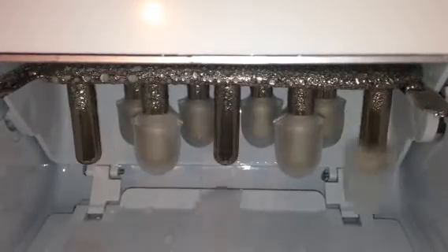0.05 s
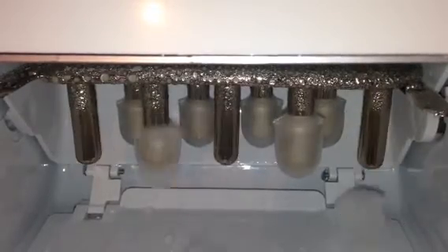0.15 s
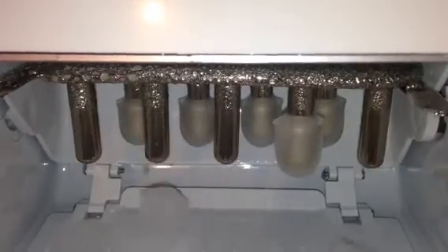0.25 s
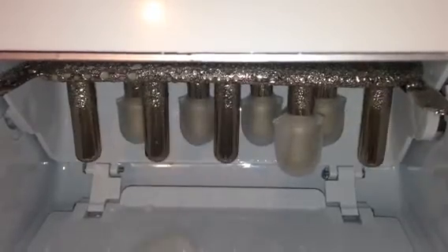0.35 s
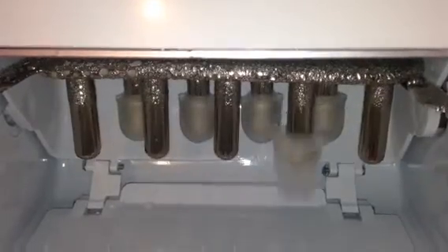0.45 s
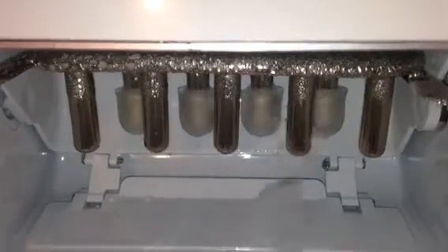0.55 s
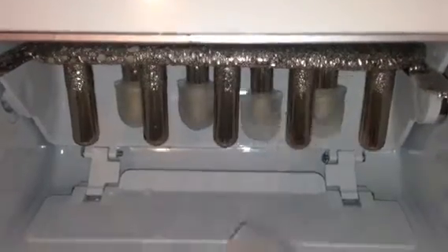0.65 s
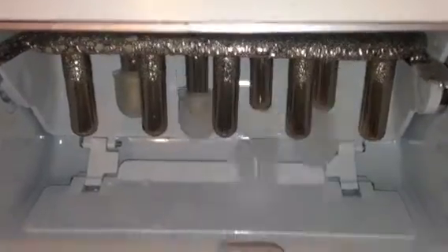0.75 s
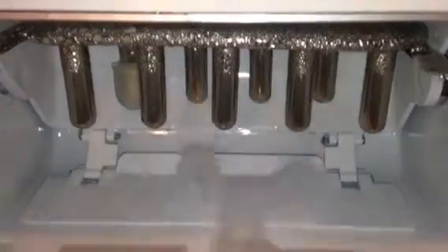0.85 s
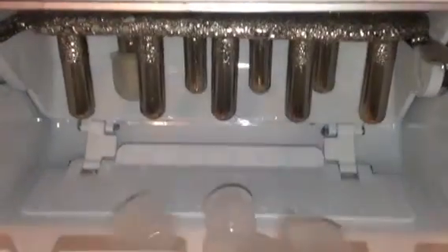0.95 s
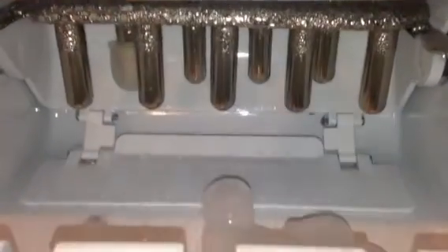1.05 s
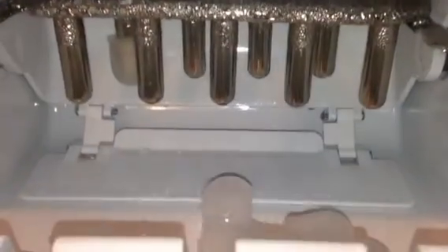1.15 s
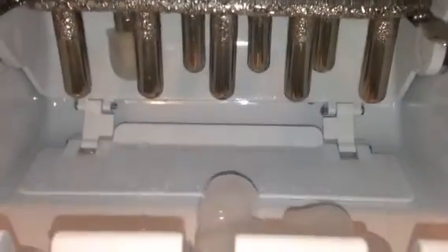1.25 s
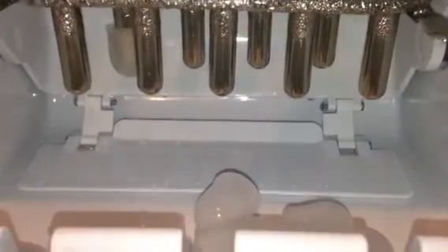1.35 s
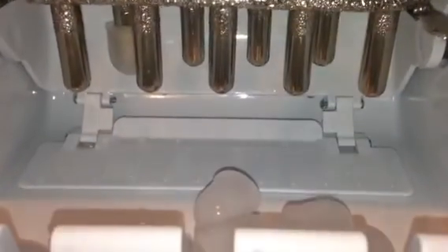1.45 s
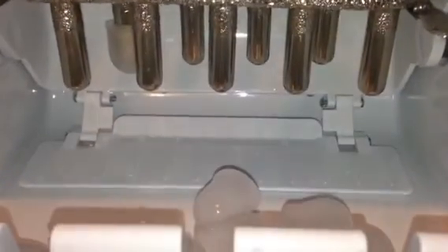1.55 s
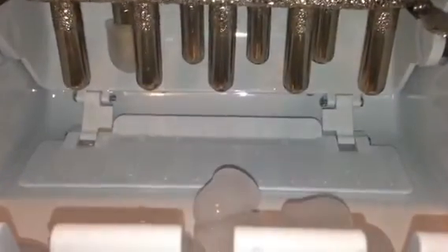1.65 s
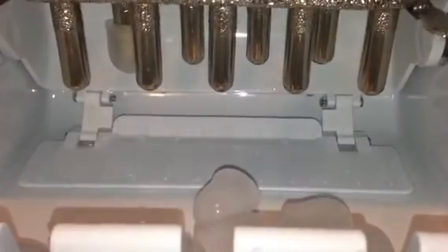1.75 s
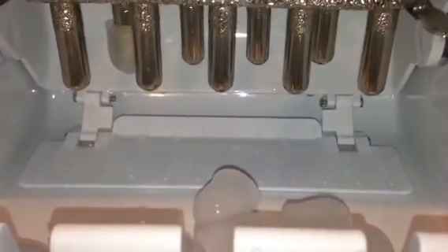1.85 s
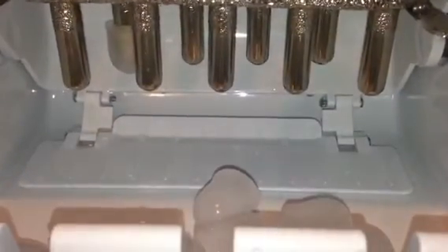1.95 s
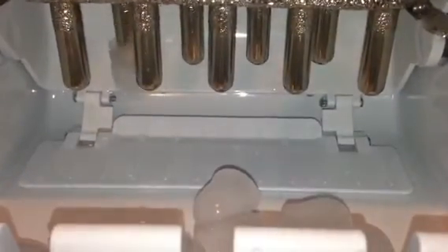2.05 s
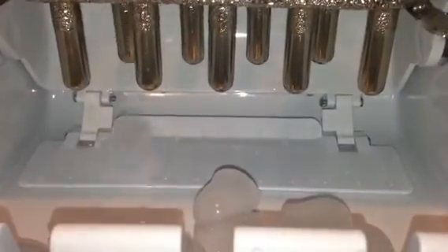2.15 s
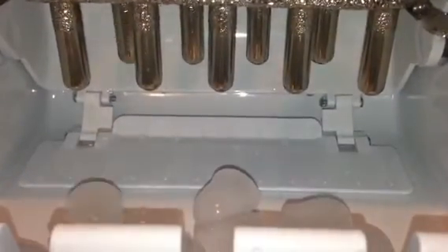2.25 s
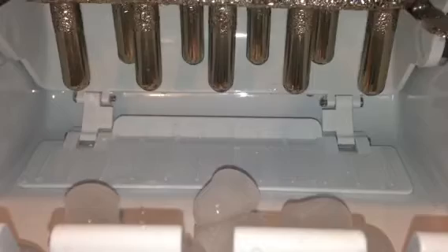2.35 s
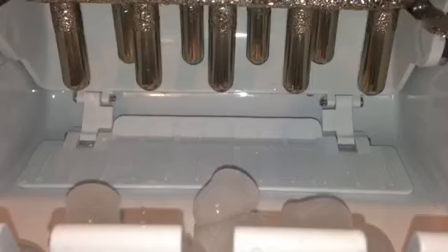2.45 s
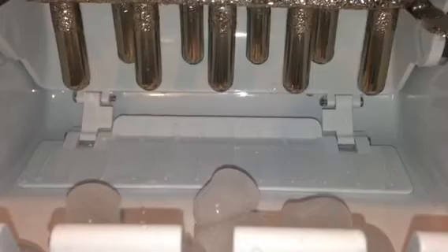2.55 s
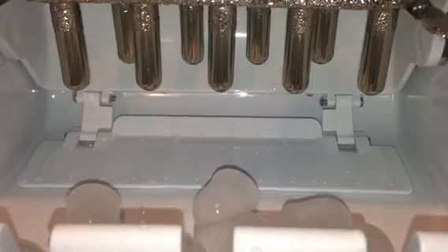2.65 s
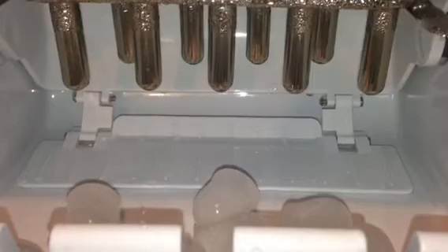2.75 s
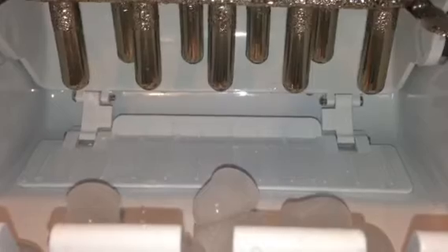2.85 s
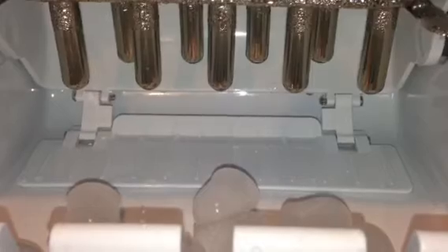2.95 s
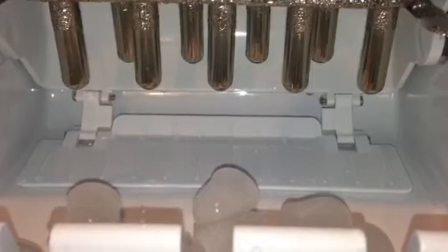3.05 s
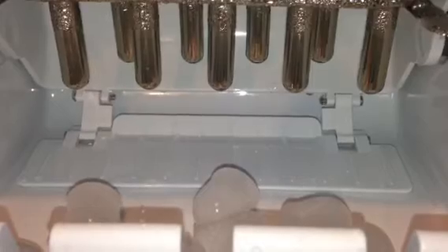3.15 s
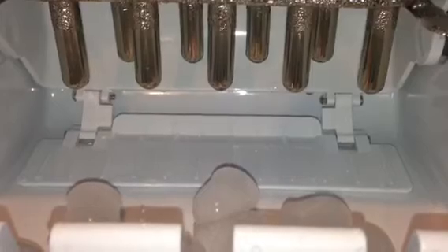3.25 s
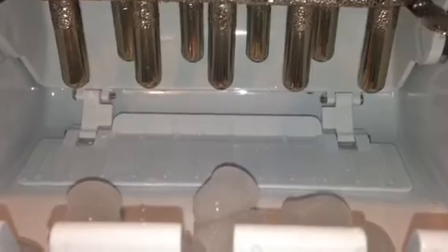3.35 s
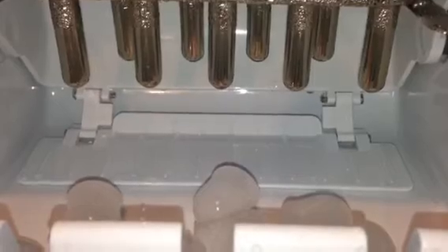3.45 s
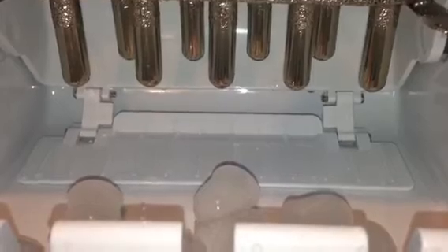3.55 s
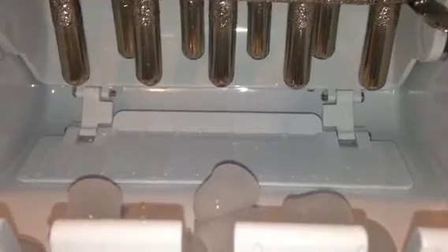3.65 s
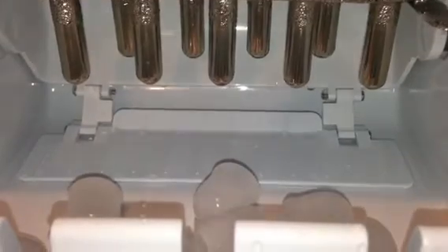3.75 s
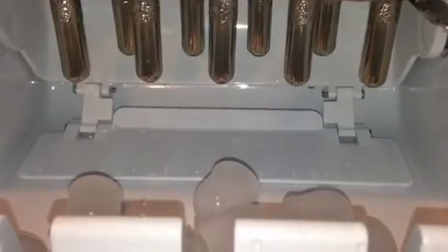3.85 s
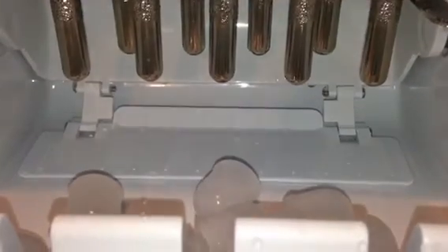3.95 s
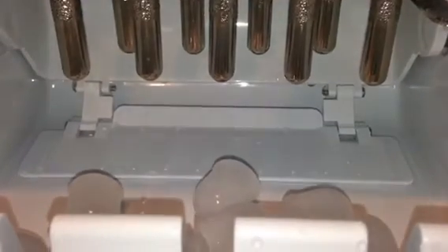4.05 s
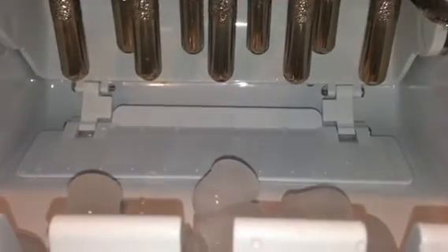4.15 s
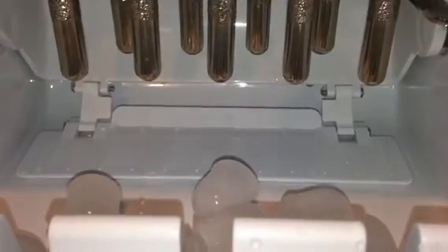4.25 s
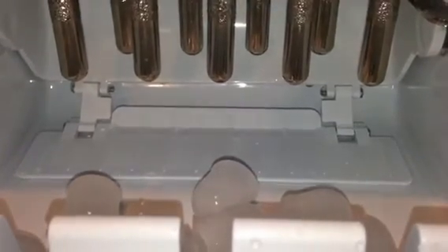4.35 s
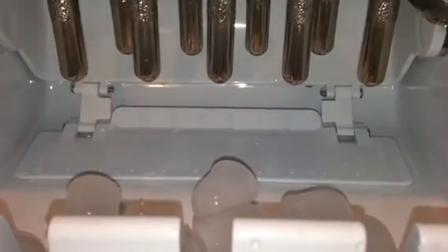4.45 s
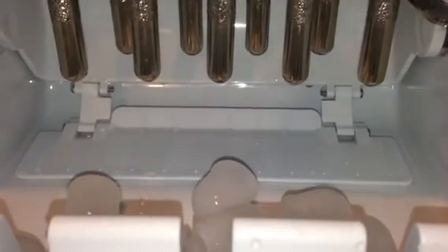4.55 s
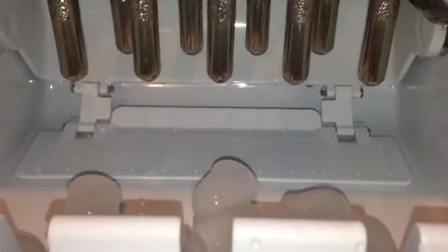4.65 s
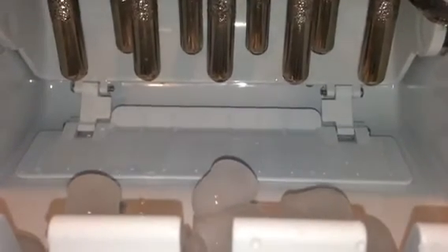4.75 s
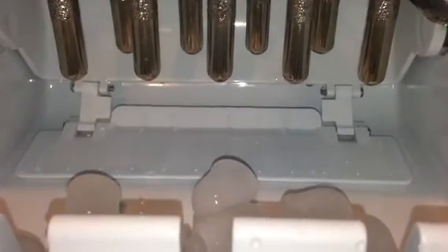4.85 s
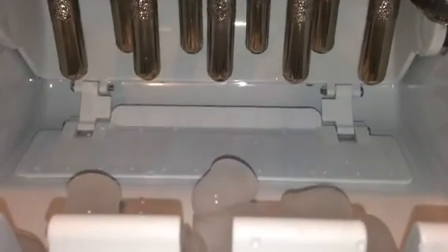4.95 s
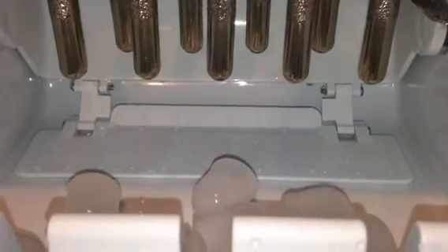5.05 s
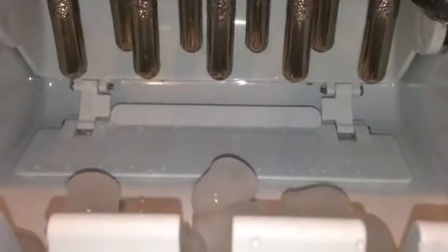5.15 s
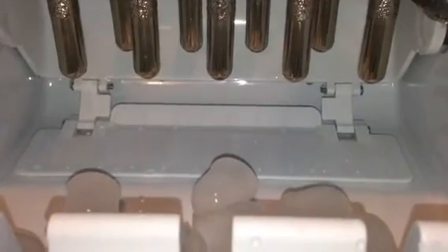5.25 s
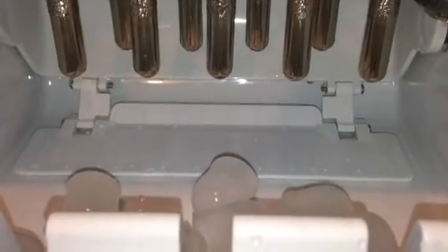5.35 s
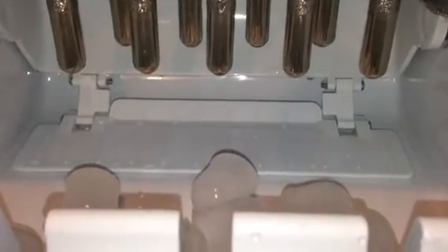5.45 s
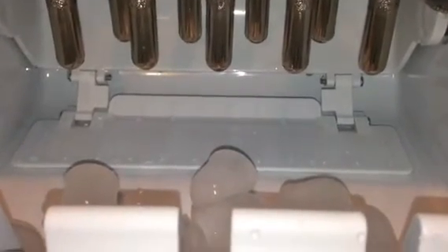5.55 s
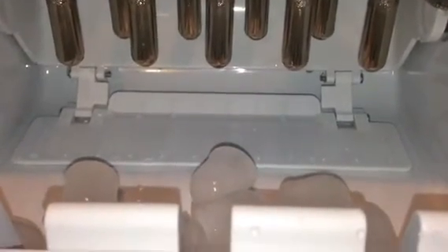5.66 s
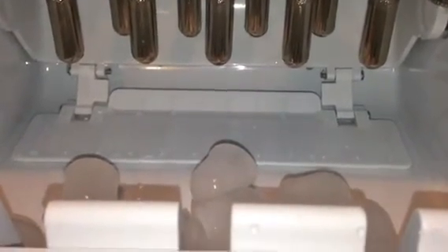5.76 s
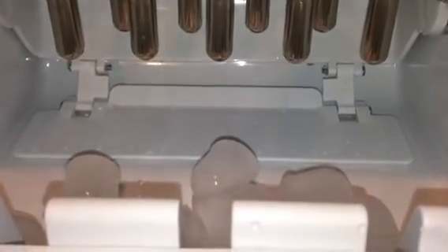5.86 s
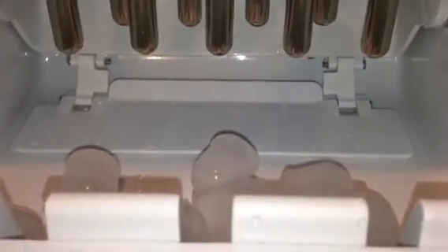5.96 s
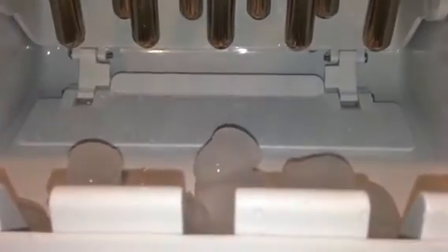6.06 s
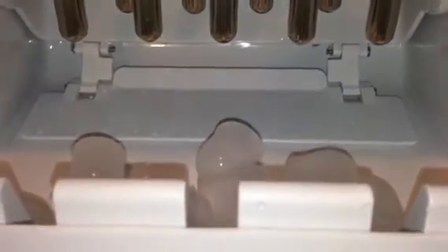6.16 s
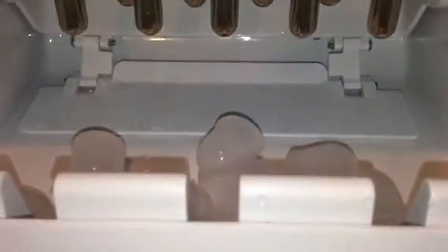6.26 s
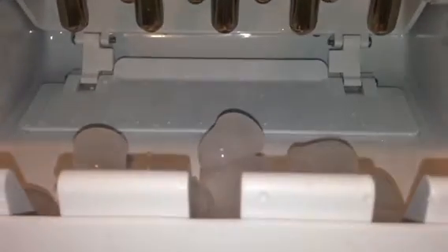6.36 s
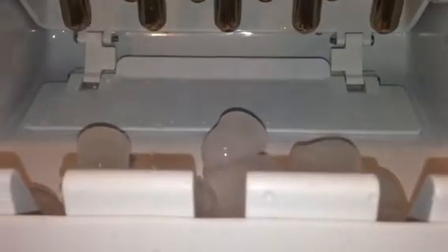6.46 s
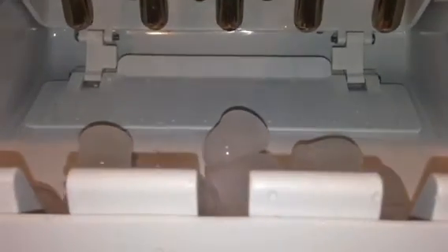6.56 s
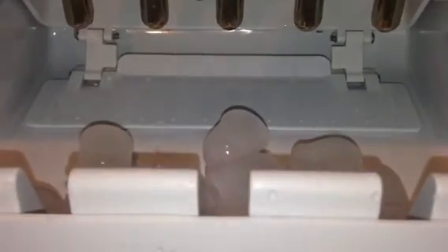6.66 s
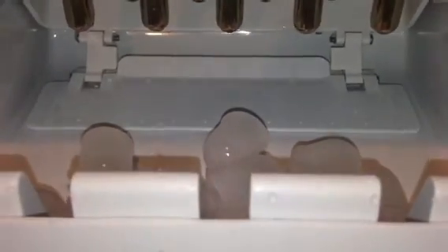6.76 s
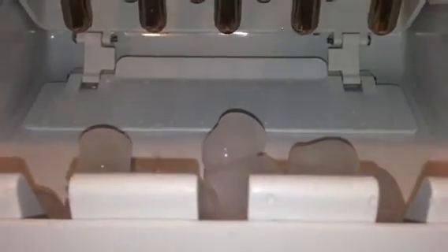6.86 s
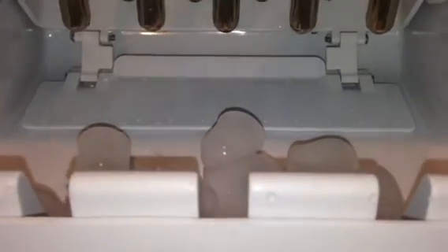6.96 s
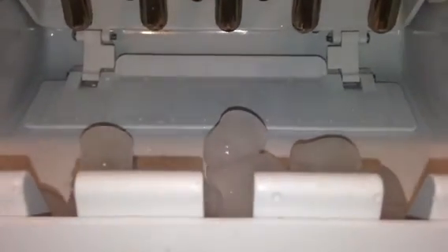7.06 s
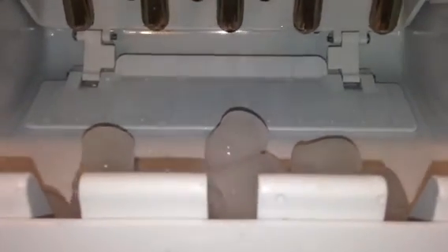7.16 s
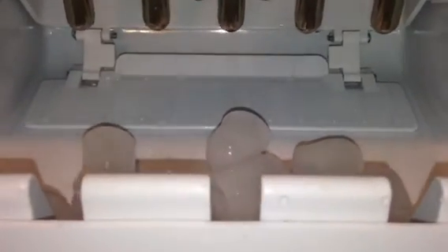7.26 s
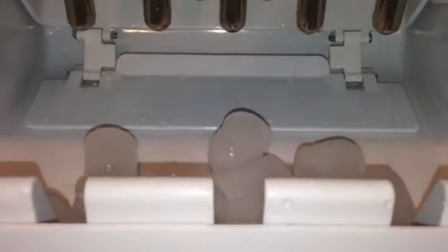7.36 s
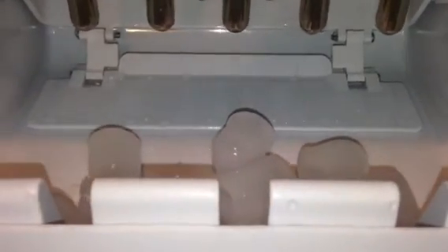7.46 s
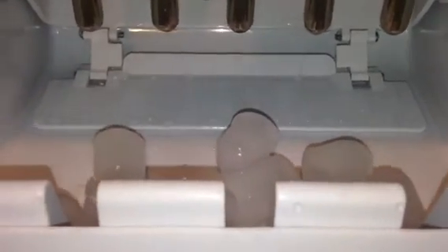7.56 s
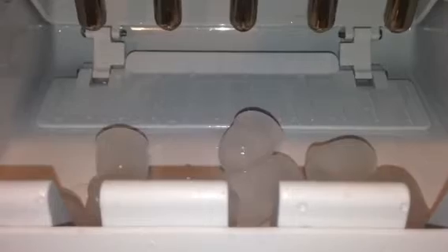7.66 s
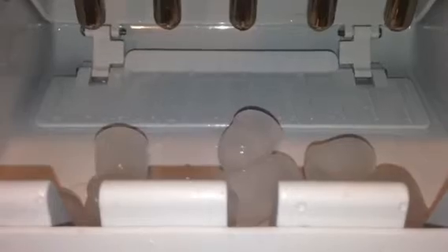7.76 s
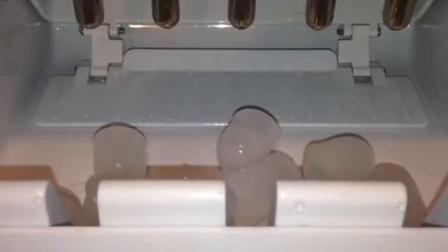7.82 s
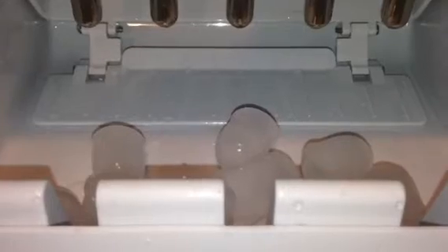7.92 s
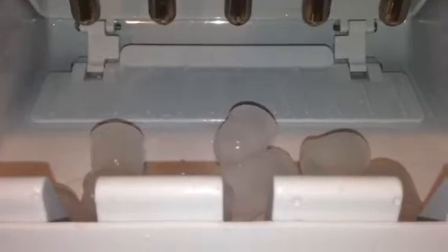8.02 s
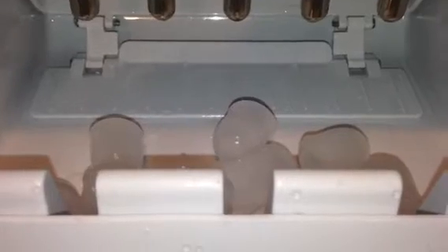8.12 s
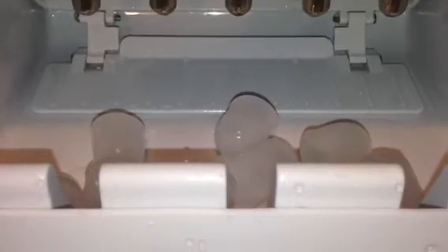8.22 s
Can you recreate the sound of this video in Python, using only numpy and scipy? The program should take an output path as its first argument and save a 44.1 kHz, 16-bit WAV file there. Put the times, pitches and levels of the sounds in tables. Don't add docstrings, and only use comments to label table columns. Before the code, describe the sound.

Ice cubes clatter in a dense burst onto a plastic tray over fan hum and hiss, one drops later, then a clunk ends the hiss.

```python
import sys
import numpy as np
from scipy import signal
from scipy.io import wavfile
from scipy.ndimage import uniform_filter1d, minimum_filter1d

SR = 44100
rng = np.random.default_rng(int(sys.argv[2]) if len(sys.argv) > 2 else 0)


def pcm_store(signal):
    levels = np.round(np.clip(np.atleast_2d(signal), -1, 1) * 32767)
    wavfile.write(sys.argv[1], SR, levels.astype(np.int16).T)


def level_to_linear(level):
    exponent = np.asarray(level, float) / 20
    return 10 ** exponent


N = 365581


def evened(x):
    return x / np.sqrt(np.mean(x ** 2) + 1e-20)


def peaked(x):
    return x / (abs(x).max() + 1e-20)


def colour(x, points):
    f, db = np.transpose(points)
    hz = abs(np.fft.fftfreq(4096, 1 / SR))
    gain_db = np.interp(np.log(hz + 1), np.log(f), db)
    log_gain = np.log(level_to_linear(np.maximum(gain_db, -90)))
    taps = np.fft.ifft(np.exp(np.conj(signal.hilbert(log_gain)))).real[:2048]
    return signal.oaconvolve(x, taps)[:len(x)]


def resonate(x, hz, width):
    return signal.lfilter(*signal.iirpeak(hz, hz / width, SR), x)


def add(mix, s, sound):
    part = mix[round(s * SR):][:len(sound)]
    part += sound[:len(part)]


def drift(rate_hz):
    size, steps = round(SR / 64 / rate_hz), N // 64 + 2
    slow = uniform_filter1d(uniform_filter1d(rng.standard_normal(steps), size), size)
    return evened(np.interp(np.arange(N) / 64, np.arange(steps), slow))


def contact(noise, length_s, rise_s):
    t = np.arange(len(noise)) / SR
    return noise * abs(noise) ** 0.6 * (1 - np.exp(-t / rise_s)) * np.exp(-t / length_s)


# start in seconds,
# crack level in dB, ring of the ice in Hz, brightness in dB, level of the blow on the tray floor in dB
MAIN_FALL = [(0.002, -29, 3000, -10, -28), (0.018, -9, 1660, -19, -7), (0.0258, -10.5, 1590, -28, -30),
             (0.079, -12, 1550, -24, -13), (0.0912, -10.5, 2490, -40, -10),
             (0.105, -17.5, 1610, -22, -35), (0.123, -8.5, 1590, -30, -7),
             (0.1364, -14, 1580, -13, -17), (0.2035, -5.5, 1590, -20, -4),
             (0.209, -6.5, 1700, -23, -30), (0.2414, -24, 2050, -15, -21),
             (0.2487, -13.5, 2070, -16, -20), (0.3, -9, 1700, -20, -11), (0.3182, -22, 1640, -20, -30),
             (0.343, -13, 2600, -34, -6), (0.3503, -8, 1810, -17, -30), (0.3623, -7, 4200, -34, -25),
             (0.3758, -11, 1610, -25, -30), (0.3907, -14, 1680, -10, -35), (0.4233, -4, 3020, -18, -9),
             (0.4367, -14, 2100, -17, -35), (0.455, -20, 1900, -11, -18.5),
             (0.4697, -2.5, 4500, -22, -28), (0.517, -9, 5950, -38, -40),
             (0.5871, -1.5, 2600, 4, -13), (0.604, -16, 1600, -28, -2.5), (0.6179, -14, 3500, -30, -38),
                 (0.6864, -18, 1480, -16, -12), (0.6969, -4, 1810, -20, -7.5),
                 (0.7312, -17.5, 1530, -23, -17), (0.7827, -15, 2400, -42, -21),
                 (0.8039, -14.5, 2400, -15, -20), (0.82, -3, 1690, -7, -11),
                 (0.8525, -17, 1780, -12, -12.5), (0.864, -17, 2800, 2, -25),
                 (0.8752, -13.5, 3000, -5, -22), (0.897, -2.5, 5900, -8, -12),
                 (0.9143, -4.5, 3800, -19, -11), (0.939, -11.5, 2500, 0, -20), (0.956, -7.5, 2040, -9, -10),
                 (0.9697, -7.5, 1800, -8, -14), (0.9813, -9, 3350, -13, -22), (0.99, -3.5, 1700, 1, -8),
                 (1.0028, -15, 3000, -12, -22), (1.019, -8.5, 2600, -6, -7.5)]
ROLLING_OUT = [
    (1.032, -23, 1900, -19, -35),
    (1.0525, -13, 3430, -5, -14),
    (1.069, -13.5, 3400, -9, -23),
    (1.0863, -18, 1710, -35, -32),
    (1.1059, -6, 2730, -48, -21.5),
    (1.1344, -37, 1500, -30, -26),
    (1.187, -30, 1600, -15, -45),
    (1.2278, -25, 2000, -8, -45),
]
LAST_CUBE_FALL = [(2.16, -4.5, 2050, -4, -10), (2.188, -12, 3000, -2, -14), (2.1964, -6, 2000, -8, -20),
                  (2.204, -15, 1870, -20, -30), (2.2235, -10, 1960, -15, -15),
                  (2.2455, -17, 3800, -29, -16), (2.2654, -24, 3600, -22, -32),
                  (2.294, -4.5, 1615, -12, -9), (2.3085, -17, 1670, -16, -23), (2.33, -11.5, 1640, 5, -28),
                  (2.337, -24, 1700, -20, -13), (2.3475, -20, 3480, -24, -17)]
ICE_SETTLING = [
    (4.992, -30, 1740, -25, -40),
    (5.0102, -22, 3800, -35, -36),
    (5.013, -20, 1740, -40, -29),
    (5.057, -32, 1900, -22, -50),
]
STRIKES = MAIN_FALL + ROLLING_OUT + LAST_CUBE_FALL + ICE_SETTLING
# frequency in Hz, spectrum level in dB per Hz
STRIKE_COLOUR = [(530, -25), (900, -20), (1690, 9), (2160, 4.5), (3070, 0), (5490, -13.5), (5980, -11),
                 (13500, -33.5), (14800, -46), (16400, -66)]
# frequency in Hz, width in Hz, level in dB
HOUSING_MODES = [(1250, 220, -7), (1560, 130, -3), (1740, 90, 0), (1920, 130, -4), (2470, 160, -6),
                 (3100, 170, -6), (3940, 200, -7), (4940, 250, -9), (5980, 250, -9)]
CONTACT_S, CONTACT_S_PER_DB = .0032, .00003
HOUSING_DB, HOUSING_PER_DB = -12.5, .35


def knocks():
    out = np.zeros(N)
    noise = rng.standard_normal((len(STRIKES), 3000))
    spread = rng.uniform(1.3, 2.5, (len(STRIKES), 2))
    places = rng.uniform(-1, 1, (len(STRIKES), len(HOUSING_MODES)))
    for (s, db, hz, bright_db, floor_db), n, (second, third), place in zip(STRIKES, noise, spread, places):
        on_floor = np.clip(floor_db - db, -30, 10)
        share_db = HOUSING_DB + HOUSING_PER_DB * on_floor
        blow = contact(n, max(CONTACT_S + CONTACT_S_PER_DB * on_floor, .001), 0.0011)
        tilt = [(bright_db + 22) * np.clip(np.log2(f / 3000) / 2.25, 0, 1) for f, v in STRIKE_COLOUR]
        fill = [(share_db + 8) * (f < 2300) for f, v in STRIKE_COLOUR]
        crack = colour(blow, [(f, v + a + b) for (f, v), a, b in zip(STRIKE_COLOUR, tilt, fill)])

        tap = contact(n, 0.0011, 0.00027) + 0.51 * blow
        ice = resonate(tap, hz, .07 * hz)
        ice = ice + 0.16 * resonate(tap, hz * second, 140) + 0.17 * resonate(tap, hz * third, 210)
        lump = resonate(resonate(blow, hz, .35 * hz), hz, .35 * hz)
        housing = sum(level_to_linear(v + 4 * p) * resonate(tap, f * (1 + .03 * p), w)
                      for (f, w, v), p in zip(HOUSING_MODES, place))
        body = .4 * peaked(ice) + .35 * peaked(lump) + level_to_linear(share_db + 3) * peaked(housing)
        add(out, s, level_to_linear(db) * peaked(peaked(crack) + body))
    return out


# frequency in Hz, width in Hz, level in dB
TRAY_MODES = [(340, 70, -10), (430, 70, -3), (560, 90, -2), (670, 90, 4), (1050, 250, -7)]
FLOOR_HZ, FLOOR_SPREAD, FLOOR_RING = 455, .12, .9


def thumps():
    out, t = np.zeros(N), np.arange(4000) / SR
    noise = rng.standard_normal((len(STRIKES), len(t)))
    places = rng.uniform(-1, 1, (len(STRIKES), len(TRAY_MODES)))
    for (s, *_, db), n, place in zip(STRIKES, noise, places):
        hz = FLOOR_HZ * (1 + FLOOR_SPREAD * place[0])
        push = np.sin(2 * np.pi * hz * t) * (t / .0017) * np.exp(-t / .0017)
        drive = contact(n, 0.0018, 0.00026)
        modes = sum(level_to_linear(v + 3 * p) * resonate(drive, f * (1 + .06 * p), 1.3 * w)
                    for (f, w, v), p in zip(TRAY_MODES, place))
        add(out, s - .001, level_to_linear(db) * peaked(peaked(push) + FLOOR_RING * peaked(modes)))
    return out


SKID_DB, SKID_S = -18, .042


def rattle():
    struck = rng.random(N) < 2500 / SR
    tick_db = 3 * np.minimum(rng.exponential(1, N), 3)
    ticks = struck * level_to_linear(tick_db) * rng.choice([-1, 1], N)
    tray = sum(level_to_linear(v) * resonate(ticks, f, w) for f, w, v in TRAY_MODES)
    body = evened(colour(ticks, STRIKE_COLOUR)) + 1.2 * evened(tray)
    jolts = np.zeros(N)
    for s, db, *_ in STRIKES:
        jolts[round(s * SR)] += level_to_linear(db) ** 2
    motion = abs(signal.oaconvolve(jolts, np.linspace(1, 0, round(SKID_S * SR)) ** 2)[:N])
    return level_to_linear(SKID_DB) * evened(body) * np.sqrt(motion)


# frequency in Hz, t60 in seconds
CAVITY_DECAY = [(300, 0.125), (1000, 0.1), (3000, 0.079), (8000, 0.055), (16000, 0.038)]


def cavity(x):
    hz, t, z = signal.stft(rng.standard_normal((4, SR // 4)), SR, nperseg=128)
    t60 = np.interp(hz, *np.transpose(CAVITY_DECAY))[:, None]
    tails = signal.istft(z * level_to_linear(-60 * t / t60), SR, nperseg=128)[1]
    turn = 2 * np.pi * (9.3 * np.arange(N) / SR + np.arange(4)[:, None] / 4)
    share = np.maximum(np.cos(turn), 0)
    return sum(signal.oaconvolve(x * w, tail / np.linalg.norm(tail))[:N] for w, tail in zip(share, tails))


# frequency in Hz, spectrum level in dB per Hz
FAN_COLOUR = [(30, -26), (48, -26), (70, -16.5), (130, -8), (240, -10.5), (420, -7), (700, -9),
              (880, -43.5), (1300, -21), (2800, -23.5), (4000, -28), (7000, -39), (12000, -41.5),
              (15500, -40)]
# frequency in Hz, width in Hz, level in dB
DUCT_MODES = [(166, 16, -11), (401.5, 10, -3), (647, 20, -7), (1550, 150, -27.5), (2940, 580, -31.5)]
# frequency in Hz, rms level in dB, pitch factor once the valve has shut
MOTOR_TONES = [(59, -58, 1), (281, -50, 1), (321.2, -48, 1), (526, -48, .997), (562, -55, 1),
               (802.9, -64, 1), (963.4, -60, 1), (1287, -72, 1), (1606, -67, 1), (1922, -68, 1),
               (2045.6, -57, .996), (2622, -73, 1), (3037, -66, .998), (3212, -69, .997), (4657, -77, 1),
               (6056, -78, 1)]
FAN_DB = -40.5


def machine():
    t = np.arange(N) / SR
    air = evened(colour(rng.standard_normal(N), FAN_COLOUR))
    stir = rng.standard_normal(N)
    air = air + sum(level_to_linear(v) * evened(resonate(stir, f, w)) for f, w, v in DUCT_MODES)
    tones = 0
    for hz, db, sag in MOTOR_TONES:
        turns = np.cumsum(hz * np.where(t > VALVE_BLOWS[1][0], sag, 1)) / SR
        level = level_to_linear(db + 1.5 * drift(6)) * np.sqrt(2)
        tones = tones + level * np.cos(2 * np.pi * turns + 1.2 * drift(8))
    return air * level_to_linear(FAN_DB - 5.5) * level_to_linear(0.46 * drift(5)) + tones


def whistle(x, hz, width):
    turn = np.exp(2j * np.pi * np.cumsum(hz * np.ones(len(x))) / SR)
    r = np.exp(-np.pi * width / SR)
    smooth = signal.lfilter([1], np.convolve([1, -r], [1, -r]), x / turn)
    return evened((turn * smooth).real)


# frequency in Hz, spectrum level in dB per Hz
GAS_COLOUR = [(180, -26.5), (300, -3.5), (468, -6), (552, -0.5), (890, -22.5), (967, -15.5), (1810, -34.5),
              (2000, -13.5), (2170, -20.5), (3110, -17), (5360, -23), (6430, -16.5), (9710, -25.5),
              (13300, -25), (15400, -24.5)]
# frequency in Hz, width in Hz, level in dB
PIPE_MODES = [(1550, 230, -8.5), (1957, 100, -12.5), (3100, 470, -6), (5990, 100, -10), (6435, 120, -6),
              (7300, 150, -14), (7630, 180, -9.5), (8460, 150, -16.5), (10500, 200, -15), (10980, 89, -22),
              (12800, 150, -13), (14150, 124, -20), (14600, 120, -28), (4250, 120, -17)]
# frequency when loudest in Hz, width in Hz,
# climb in Hz per second
MOVING_MODES = [(13440, 330, 10), (11450, 300, 120), (12100, 380, 300), (15230, 130, 5), (14300, 200, 130)]
# loudest moment in seconds, level in dB, time to fade by 6 dB in seconds
MODE_SWELLS = [
    (5.3, -47, 2),
    (3.4, -54.5, 1.8),
    (7.5, -50, 1.5),
    (4.6, -58.5, 2.3),
    (5.2, -66, 2.5),
]
SWELL_SHAPE = 2.6
HISS_DB, HISS_DB_PER_S = -52.4, .2


def gas():
    t = np.arange(N) / SR
    jets = rng.standard_normal((5, N))
    pipes = sum(level_to_linear(v) * evened(resonate(resonate(jets[k % 2], f, w), f, w))
                for k, (f, w, v) in enumerate(PIPE_MODES))
    flow = level_to_linear(HISS_DB + HISS_DB_PER_S * t + .5 * drift(26))
    out = flow * (level_to_linear(7.5) * evened(colour(jets[2], GAS_COLOUR)) + level_to_linear(3.5) * evened(pipes))
    for k, ((hz, width, climb), (s, db, span)) in enumerate(zip(MOVING_MODES, MODE_SWELLS)):
        swell = level_to_linear(db - 6 * abs((t - s) / span) ** SWELL_SHAPE)
        out += swell * whistle(jets[3 + k % 2], hz + climb * (t - s), width)
    return out * level_to_linear(-60 * np.maximum(t - VALVE_BLOWS[1][0], 0) / .16)


# start in seconds, peak level in dB
VALVE_BLOWS = [
    (7.536, -29),
    (7.546, -3.5),
]
# frequency in Hz, spectrum level in dB per Hz
SLAM_COLOUR = [(120, -66), (200, -34), (426, -5.5), (687, -11.5), (923, -34), (1890, -23), (2890, -27),
               (3960, -26), (9070, -28), (14900, -39), (16400, -71)]
# frequency in Hz, level in dB, t60 in seconds
VALVE_RING = [(425, -7, 0.085), (520, -11, 0.06), (680, -8.5, 0.06), (1367, -20.5, 0.091),
              (1550, -14, 0.02), (1914, -19, 0.06), (2121, -18, 0.055), (2280, -40, 0.16)]


def valve():
    out, t = np.zeros(N), np.arange(9000) / SR
    for s, db in VALVE_BLOWS:
        crack = colour(contact(rng.standard_normal(len(t)), .003, .0006), SLAM_COLOUR)
        shake = colour(rng.standard_normal(len(t)), SLAM_COLOUR)
        shake = shake + 4 * resonate(shake, 3700, 1000) + 1.1 * resonate(shake, 1800, 700)
        shake = shake * level_to_linear(-60 * t / .13)
        ring = sum(level_to_linear(v - 60 * t / t60) * np.sin(2 * np.pi * f * t) for f, v, t60 in VALVE_RING)
        ring = ring * (1 - np.exp(-t / 0.0011))
        add(out, s, level_to_linear(db) * peaked(peaked(crack) + .6 * peaked(ring) + .35 * peaked(shake)))
    return out


def scene():
    hits = level_to_linear(5.0) * (knocks() + thumps()) + level_to_linear(-1.0) * rattle()
    hits = signal.sosfilt(signal.butter(4, 290, "high", fs=SR, output="sos"), hits)
    slam = level_to_linear(5.0) * valve()
    tail = cavity(level_to_linear(-6.0) * hits + level_to_linear(-11) * slam)
    return (hits + slam + tail + machine() + gas())[None]


# frequency in Hz, level against the mean treble of the moment in dB
TREBLE_MASK = [(4000, -24), (8000, -12), (9700, -7.5), (12500, -7), (13800, -5), (15000, -4)]


def thin(x):
    hz, t, z = signal.stft(x, SR, nperseg=2048, noverlap=1536)
    power = uniform_filter1d(uniform_filter1d(abs(z) ** 2, size=6, axis=0), size=7, axis=1)
    treble = power[(hz > 5000) & (hz < 12500)].mean(0)
    mask_db = np.interp(hz, *np.transpose(TREBLE_MASK), left=-90)
    keep = power > minimum_filter1d(treble, size=9) * level_to_linear(2 * mask_db)[:, None]
    keep |= -minimum_filter1d(-treble, size=9) > level_to_linear(2 * -67)
    keep[hz > 15400] = treble > level_to_linear(2 * -54.5)
    return signal.istft(z * keep, SR, nperseg=2048, noverlap=1536)[1][:N]


def band_limit(x):
    return signal.sosfilt(signal.butter(12, 16510, fs=SR, output="sos"), x)


def record(dry):
    power_db = 10 * np.log10(abs(uniform_filter1d(dry[0] ** 2, 200)) + 1e-12)
    over_db = np.clip(.8 * (power_db + 23), 0, 4.8)
    hold = round(.12 * SR)
    held = -minimum_filter1d(-over_db, hold, origin=(hold - 1) // 2)
    fall = np.arange(N) * 27.4 / SR
    duck_db = np.maximum(np.maximum.accumulate(held + fall) - fall, 0)
    x = 0.93 * np.tanh(dry / level_to_linear(uniform_filter1d(duck_db, 90)) / 0.96)
    x = signal.sosfilt(signal.butter(2, 45, "high", fs=SR, output="sos"), x)
    mix = thin(x[0])[None]
    return band_limit(mix)


dry = scene()
out = record(dry)
pcm_store(out)
```